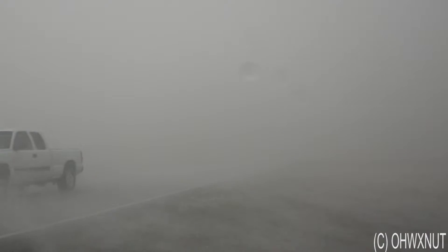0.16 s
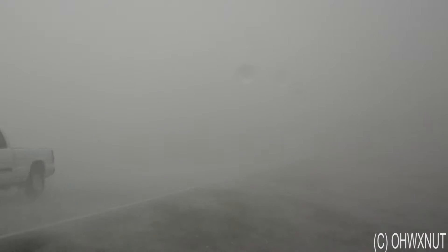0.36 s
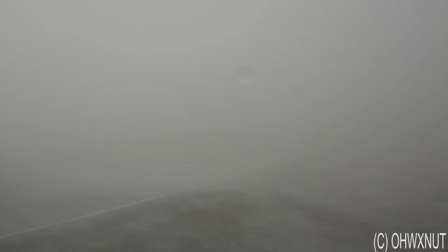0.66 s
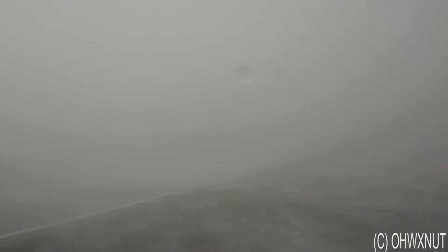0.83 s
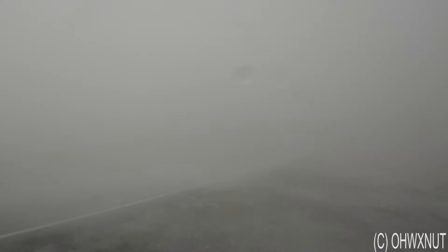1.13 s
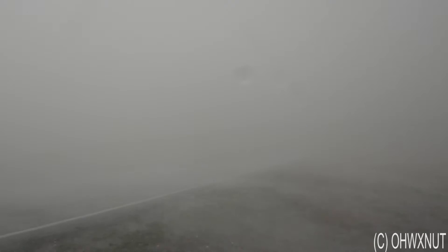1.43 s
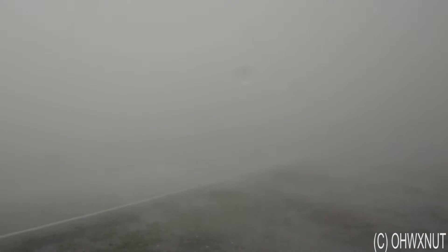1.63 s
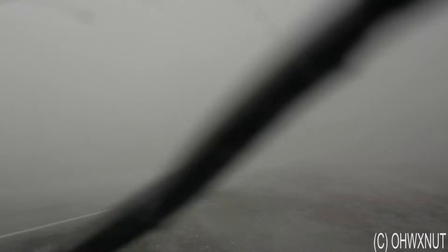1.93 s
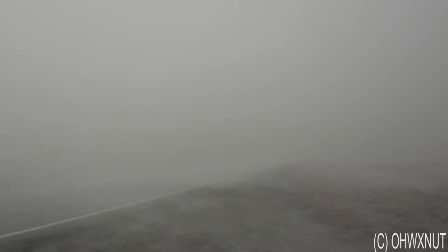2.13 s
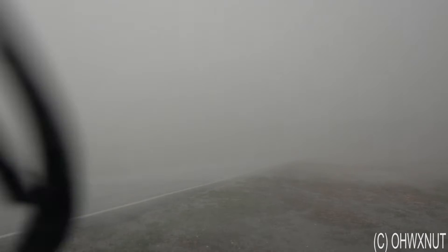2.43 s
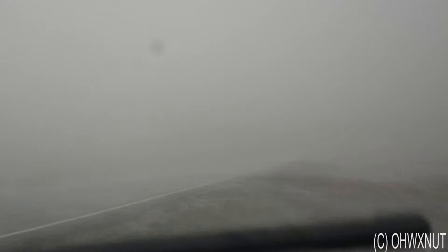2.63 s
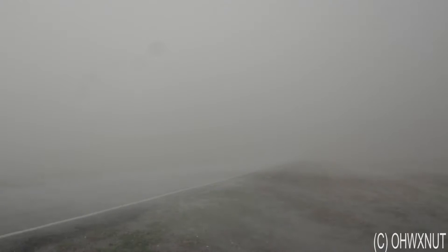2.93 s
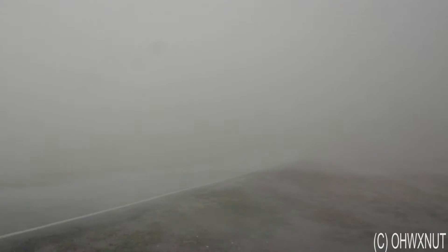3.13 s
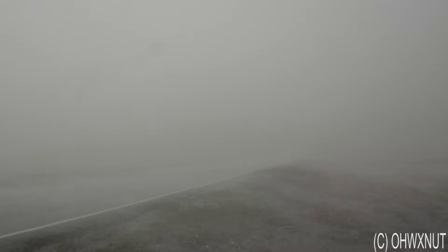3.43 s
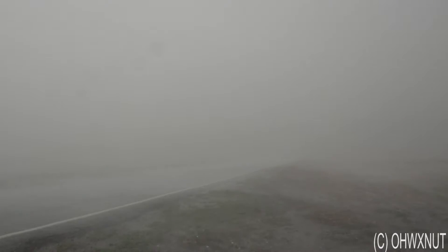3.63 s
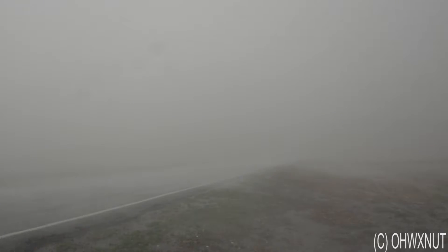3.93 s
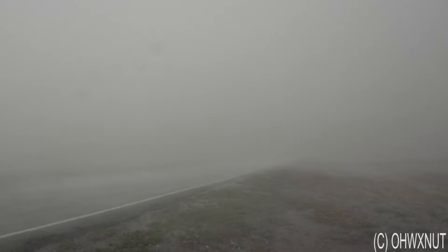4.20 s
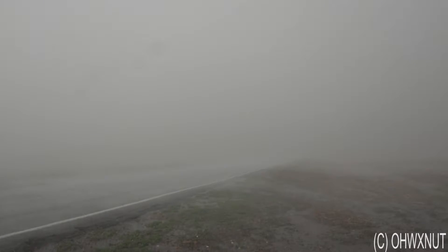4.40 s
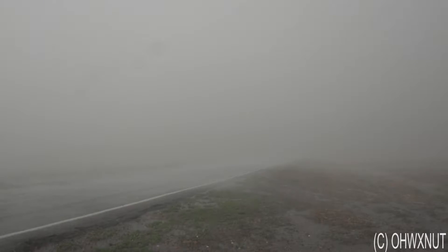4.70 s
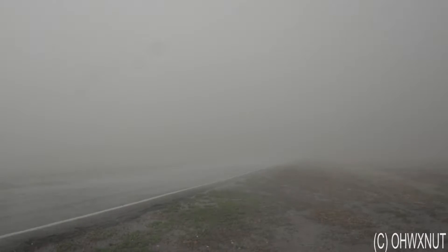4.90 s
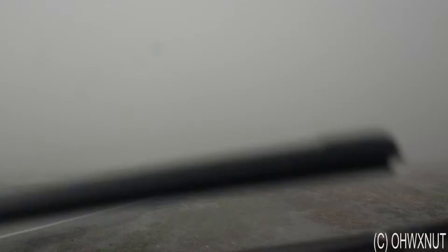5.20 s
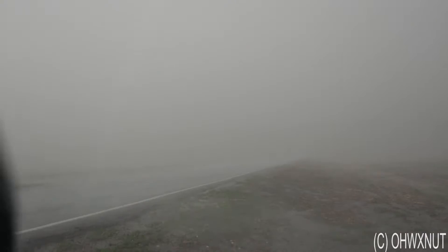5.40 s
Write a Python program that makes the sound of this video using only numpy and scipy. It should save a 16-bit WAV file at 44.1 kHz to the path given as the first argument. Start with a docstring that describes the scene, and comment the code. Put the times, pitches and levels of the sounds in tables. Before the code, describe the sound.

The listener is inside a parked car on an open road during a storm. A low, booming four-cylinder idle runs throughout, pulsing quickly and slightly unevenly, with deep wind rumble and buffeting of the body beneath it. Over this, rain hisses and patters on glass, with fine airy spray above and duller drumming on the roof. Sheets jump up and fade from the start; the rain swells around 0.9 s, dips near 1.2, flicks up at 1.7, dips, then surges again just after 2 s. Soft, dull wiper knocks come at about 2.3 and 2.9 s. From 3.2 s the rain thins, with short bursts at 3.4 and 3.6, then returns around 3.8 to 4 s. It swells again near 4.3, thins with a sudden splash at 4.7, and another low wiper thump lands at 5.0 s. Lighter gusts continue to the end at 5.5 s. Close small stereo microphone, wider in the treble.

```python
"""Inside a parked car in a storm: rain on glass and roof, a wind-shaken body and a booming four-cylinder idle.
From the start, sheets of rain jump up and fade; the rain swells near 0.9 s and again after 2 s.
The wiper gear knocks at about 2.3 and 2.9 s. The rain thins from 3.2 s, returns near 3.8 s and thins again;
the wipers knock once more at 5 s. Rain and wind are shaped noise, the engine is pushes ringing through
resonances plus a slow rocking, and the knocks are fading sines. A small camera with two close ports listens."""
import sys
import numpy as np
from scipy import signal
from scipy.fft import rfft, irfft, next_fast_len
from scipy.io import wavfile
from scipy.ndimage import uniform_filter1d, map_coordinates

SR = 44100
rng = np.random.default_rng(int(sys.argv[2]) if len(sys.argv) > 2 else 0)


def log_audio(samples):
    """Write samples as a 16-bit WAV file to the path given in sys.argv[1]."""
    # one column per channel
    frames = np.atleast_2d(samples).T
    # limit to full scale, then quantise
    limited = np.clip(frames, -1, 1)
    pcm = np.round(limited * 32767).astype(np.int16)
    wavfile.write(sys.argv[1], SR, pcm)


N = 244755
T = np.arange(N) / SR  # time of each sample, s

# how the body's rumble is spread over pitch: [f/Hz, relative level/dB]
RUMBLE_COLOUR = [(12, -26), (35, -13), (100, 3.5), (150, 6), (185, 3), (220, -1.5), (400, -50),
                 (2000, -120)]
# the same for the body's deep buffet: [f/Hz, relative level/dB]
BUFFET_COLOUR = [(10, -50), (20, -20), (33, -6), (50, 0), (70, 0), (100, -5), (160, -40), (800, -120)]

# the idle hunts a little: [t/s, how far the crank runs ahead of an even speed/ms]
CRANK_AHEAD = [(0, -.4), (.8, 3), (1.04, 2.8), (1.43, 4.8), (1.69, 4.9), (1.95, 3.7), (2.25, 4.7),
               (2.73, 3.9), (3.64, 5.2), (3.9, 6.2), (4.42, 3.9), (4.68, 3.8), (5.2, 2.7), (5.55, .9)]
# the four cylinders in firing order: [strength/dB, how early/ms]
CYLINDERS = [(0, 0), (-4.1, .3), (-1.3, .2), (-3.9, .5)]
# exhaust and cabin resonances in a row: [f/Hz, width/Hz]
BOOM_RESONANCES = [(114.3, 10), (133.9, 15.2), (154.8, 10), (173, 10)]
# the engine rocking on its mounts: [multiple of the firing rate, middle rms level/dB]
ROCKING = [(1, -43), (3, -45), (4, -41.5)]

# knocks of the wiper gear at the ends of its sweep: [t/s, level/dB, struck near f/Hz, rise/s]
WIPER_KNOCKS = [(2.318, -24.5, 225, .025), (2.912, -22, 128, .03), (2.935, -27, 270, .015),
                (2.95, -22, 670, .012), (5.024, -33, 1400, .01), (5.034, -27, 440, .01),
                (5.048, -21, 112, .022), (5.074, -39, 2200, .008)]
# modes of wiper arm, linkage and glass: [f/Hz, relative level/dB, time to fade by 60 dB/s]
WIPER_MODES = [(78, -1, .3), (124, 0, .3), (226, 0, .2), (285, -1, .1), (463, -2, .07), (635, 0, .08),
               (856, 0, .07), (1340, 0, .06), (1550, -4, .05), (2200, 0, .07)]

# slow gusts of rain on the glass, before sheets and flurries: [t/s, level/dB]
GUSTS = [(0, -32.5), (.12, -30.5), (.48, -34), (.65, -34), (.85, -27), (1.04, -27.5), (1.15, -34.5),
         (1.62, -30.5), (1.79, -38.5), (1.86, -37.5), (2.0, -28.5), (2.36, -32), (2.55, -29), (2.8, -32),
         (3.17, -42), (3.29, -38), (3.41, -47), (3.56, -43), (3.68, -38.5), (3.76, -36), (3.83, -30),
         (4.0, -31.5), (4.1, -39.5), (4.16, -40.5), (4.28, -32.5), (4.66, -44), (4.78, -45), (4.88, -37.5),
         (4.95, -46.5), (5.25, -35.5), (5.55, -40)]
# sudden sheets of rain flung at the car: [t/s, size before its rise and fade/dB, fade/s]
SHEETS = [(.1, 5, 0.026), (.67, 3.5, 0.029), (1.66, 6, 0.032), (1.745, 10, 0.016), (2.06, 13, 0.011),
          (2.17, 5, 0.03), (3.415, 11, 0.077), (3.564, 9.5, 0.082), (3.7, 8, 0.016), (4.2, 5, 0.015),
          (4.68, 13, 0.073), (5.0, 8.5, 0.042), (5.49, 9, .03)]
# raises or lowers the spray against the rule that ties it to the glass: [t/s, level/dB]
SPRAY_TRIM = [(0, -1.5), (.7, 0.5), (1.2, 0), (1.65, 2.5), (2.1, 0.5), (2.9, 0), (3.5, -0.5), (3.8, 2),
              (4.3, -2.5), (4.9, -3.5), (5.3, 2.5), (5.55, -1)]
# how the rain on each part is spread over pitch: [f/Hz, relative level/dB]
GLASS_COLOUR = [(300, -90), (900, -32), (1800, -4.5), (2500, -6), (3200, 1), (4500, 1), (5700, -4),
                (7200, -11.5), (8500, -13.5), (11000, -21), (16000, -58)]
SPRAY_COLOUR = [(1000, -90), (3000, -20), (6000, 4), (8000, 6.5), (10500, -3), (13500, -4.5), (15000, -9),
                (15800, -18)]
ROOF_COLOUR = [(40, -70), (120, -11), (260, 0.5), (350, -0.5), (470, 1), (540, -4), (1000, -3),
               (1600, -3.5), (2000, -11), (3000, -17), (6000, -23.5), (16000, -110)]

# panels that sing a little: [f/Hz, width/Hz, level against the colour/dB]
PANELS = [(461, 30, -8), (710, 100, -2.5), (1092, 52, -5), (1364, 53, -5.5), (3722, 34, 1.5)]
# left-right likeness; below 0 the ports move against each other: [f/Hz, likeness from -1 to 1]
PORT_LIKENESS = [(60, 1), (170, 0.98), (800, 0.94), (1400, 0.99), (2500, 0.99), (4300, 1), (5300, 0.99),
                 (6400, 0.62), (7100, 0.43), (8000, -0.42), (9000, -0.038), (10600, -0.24), (11900, .55),
                 (13300, 0.99), (15500, .99)]
# difference in colour between the ports: [f/Hz, left minus right/dB]
PORT_LEAN = [(23, -4), (60, 5), (150, 1), (500, -0.3), (1500, -2), (2300, -5.5), (3300, -.5), (5000, 0),
             (5600, -2.5), (7400, 0.2), (9800, -3.8), (11200, -0.5), (15000, 0)]

FIRING_HZ, FIRST_FIRING_S = 23.4833, -.0173  # even firing rate, and its starting point
MOUNT_LAG_S = .0038

# levels at a middling rain in dB, and dB gained per dB of rain on the glass
MIDDLING_DB = -33
BUFFET_DB, BUFFET_FOLLOWS = -46.5, 0.42
ROOF_DB, ROOF_FOLLOWS = -30, 0.64
SPRAY_DB, SPRAY_FOLLOWS = -42.5, 1.07
SPRAY_QUICK = 0.71  # share of quick changes in the rain that the spray follows
SHEET_RISE_S = 0.0041
TOP_HZ = 15752  # band limit of the ports


def amp(db):
    """Turn dB into gain."""
    return 10 ** (np.asarray(db) / 20)


def unit(x):
    """Scale to an rms of 1."""
    return x / np.sqrt(np.mean(x ** 2) + 1e-20)


def along(points, hz):
    """Read a curve of (f/Hz, value) points, joined on a log pitch axis."""
    f, v = np.transpose(points)
    return np.interp(np.log(hz + 1), np.log(f + 1), v)


def curves(rows):
    """Give one value per sample for each column after the time."""
    s, *cols = np.transpose(rows)
    return [np.interp(T, s, c) for c in cols]


def wobble(rate):
    """Draw a smooth random curve with `rate` knots a second."""
    knots = rng.standard_normal(int(N * rate / SR) + 4)
    return map_coordinates(knots, [T * rate])


def filtered(x, response):
    """Multiply the spectrum of x by a response that depends on frequency."""
    m = next_fast_len(N + SR // 2)
    f = np.fft.rfftfreq(m, 1 / SR)
    return irfft(rfft(x, m) * response(f), m)[..., :N]


def resonance(f, hz, width_hz):
    """A part that rings at one pitch after a push: a peak of gain 1."""
    return 1j * f * width_hz / (hz * hz - f * f + 1j * f * width_hz)


def patter(colour, spread_db, patchy_db):
    """Noise of scattered strength, like countless drops, coloured for both ports; rms 1."""
    sizes = amp(spread_db * rng.standard_normal(N))
    z = signal.stft(sizes * rng.standard_normal((2, N)), nperseg=512)[2]

    # patches in pitch and time: now one part of the car is struck, now another
    patches = uniform_filter1d(rng.standard_normal(z.shape[1:]), 8, 0)
    patches = unit(uniform_filter1d(patches, 10, 1))
    pair = signal.istft(z * amp(patchy_db * patches), nperseg=512)[1][:, :N]

    def mid_side_response(f):
        panels = 1 + sum(amp(db) * resonance(f, hz, width) for hz, width, db in PANELS)
        # this angle shares out mid and side to give the wanted likeness
        angle = np.arccos(np.clip(along(PORT_LIKENESS, f), -1, 1)) / 2
        return amp(along(colour, f)) * panels * np.array([np.cos(angle), np.sin(angle)])

    mid, side = filtered(pair, mid_side_response)
    return unit(np.array([mid + side, mid - side]))


def wind():
    """The storm shakes the body: a cabin rumble and a deeper buffet that follows the gusts."""
    rumble = amp(-32 + 1.3 * wobble(2.83)) * patter(RUMBLE_COLOUR, spread_db=2.5, patchy_db=1.5)
    buffet_db = BUFFET_DB + BUFFET_FOLLOWS * (curves(GUSTS)[0] - MIDDLING_DB)
    buffet = amp(buffet_db) * patter(BUFFET_COLOUR, spread_db=3.0, patchy_db=2.5)
    return rumble + buffet


def engine_boom():
    """One push per firing, sized by cylinder, rings through exhaust and cabin."""
    lead = SR // 4  # room for firings before the start
    last = int((T[-1] + CRANK_AHEAD[-1][1] / 1000 - FIRST_FIRING_S) * FIRING_HZ)
    count = np.arange(-5, last + 1)
    size_db, early_ms = np.transpose(CYLINDERS)[:, count % 4]
    # no two burns are quite alike: chance in strength (dB) and timing (ms)
    chance_db, chance_ms = (rng.standard_normal((len(count), 2)) * [.6, .13]).T
    even_s = FIRST_FIRING_S + count / FIRING_HZ
    ahead_ms = np.interp(even_s, *np.transpose(CRANK_AHEAD))
    when = even_s - (ahead_ms + early_ms + chance_ms) / 1000

    pushes = np.zeros(N + 2 * lead)
    pushes[np.round(when * SR).astype(int) + lead] = -amp(size_db + chance_db)
    f = np.fft.rfftfreq(len(pushes), 1 / SR)
    path = np.prod([resonance(f, hz, width) for hz, width in BOOM_RESONANCES], axis=0)
    boom = irfft(rfft(pushes) * path, len(pushes))[lead:lead + N]
    return amp(-20.5 + 0.15 * wobble(1.56)) * unit(boom)


def engine_rocking():
    """The block answers through soft mounts, a little late, at multiples of the firing rate."""
    firings = (T + curves(CRANK_AHEAD)[0] / 1000 - FIRST_FIRING_S) * FIRING_HZ
    swing = 2 * np.pi * (firings - MOUNT_LAG_S * FIRING_HZ)
    rock = np.zeros(N)
    for multiple, db in ROCKING:
        level = amp(db + 0.87 * wobble(3.57))
        rock += level * np.sqrt(2) * np.sin(multiple * swing)
    return rock


def wipers():
    """Soft rubber blows: each rings mostly the modes whose pitch is near that of the blow."""
    out, t = np.zeros(N + SR), T[:SR // 3]
    for s, db, near_hz, rise in WIPER_KNOCKS:
        start = np.sin(np.pi / 2 * np.clip(t / rise, 0, 1)) ** 2
        late = np.clip(t - rise, 0, None)  # fading begins once the rise is over
        knock = np.zeros(len(t))
        for hz, mode_db, t60 in WIPER_MODES:
            away_db = -40 * np.log2(hz / near_hz) ** 2
            level_db = db + mode_db + away_db + rng.normal(0, 3.0)
            mode = np.sin(2 * np.pi * (hz * t + rng.random()))
            knock += amp(level_db - 60 * late / t60) * start * mode
        out[round(s * SR):][:len(t)] += knock
    return out[:N]


def storm():
    """Level of the rain on the glass in dB: slow gusts with sudden sheets on top."""
    level_db = curves(GUSTS)[0]
    for s, db, fade_s in SHEETS:
        t = np.clip(T - s, 0, None)
        level_db = level_db + db * (1 - np.exp(-t / SHEET_RISE_S)) * np.exp(-t / fade_s)
    return level_db


def flurries(rate, spread_db, fade_s):
    """Handfuls of drops, `rate` a second, that land at once and thin out: a dB curve of rms 1."""
    hits = (rng.random(N) < rate / SR) * amp(spread_db * rng.standard_normal(N))
    t = T[:SR // 4]
    shape = np.exp(-t / fade_s) * (1 - np.exp(-t / 0.0043))
    swell = signal.fftconvolve(hits, shape)[:N]
    return unit(swell - swell.mean())


def rain():
    """Drops on glass and roof and a fine spray above them in pitch, all in quick flurries."""
    glass_db = storm()
    flurry_db = 0.95 * flurries(60, spread_db=5.5, fade_s=0.017) + 0.75 * wobble(120)
    glass = amp(glass_db + 0.32 + flurry_db) * patter(GLASS_COLOUR, spread_db=3, patchy_db=0.73)

    # the spray follows slow changes fully, quick ones only in part
    slow_db = uniform_filter1d(glass_db, size=SR // 8)
    followed_db = slow_db + SPRAY_QUICK * (glass_db - slow_db)
    spray_db = SPRAY_DB + SPRAY_FOLLOWS * (followed_db - MIDDLING_DB) + curves(SPRAY_TRIM)[0]
    spray = amp(spray_db + flurry_db) * patter(SPRAY_COLOUR, spread_db=5.5, patchy_db=0.5)

    # the broad roof follows the gusts sluggishly
    sluggish_db = uniform_filter1d(glass_db, size=SR // 16)
    roof_db = ROOF_DB + ROOF_FOLLOWS * (sluggish_db - MIDDLING_DB)
    roof = amp(roof_db + 0.77 * flurry_db) * patter(ROOF_COLOUR, spread_db=4, patchy_db=1.03)
    return glass + spray + roof


def scene():
    """Add all sources; engine and wipers reach both ports alike."""
    return wind() + engine_boom() + engine_rocking() + wipers() + rain()


def record(dry):
    """The two ports differ in colour; nothing is kept above the band limit."""
    ports = filtered(dry, lambda f: amp(along(PORT_LEAN, f) * [[.5], [-.5]]))
    return filtered(ports, lambda f: f < TOP_HZ)


dry = scene()
out = record(dry)
log_audio(out)
```